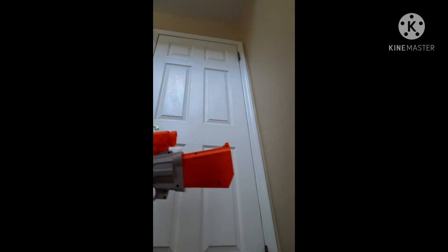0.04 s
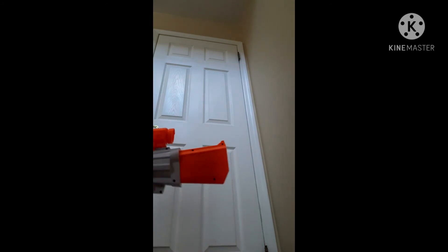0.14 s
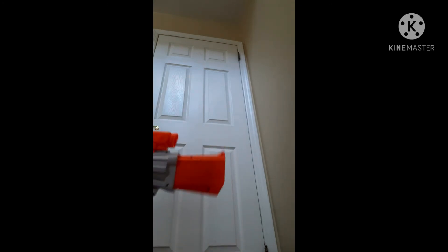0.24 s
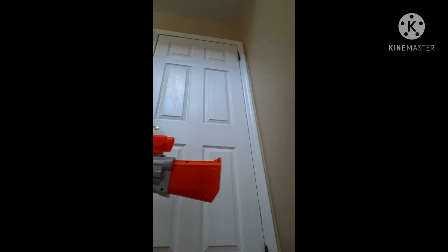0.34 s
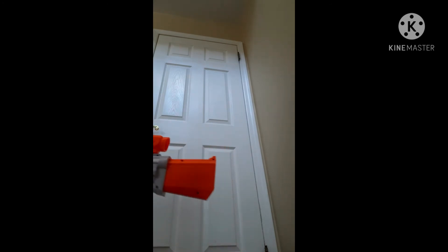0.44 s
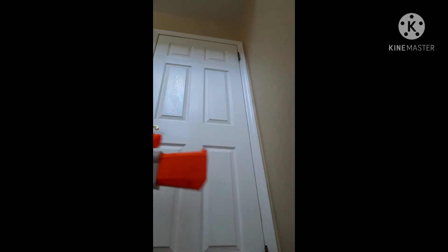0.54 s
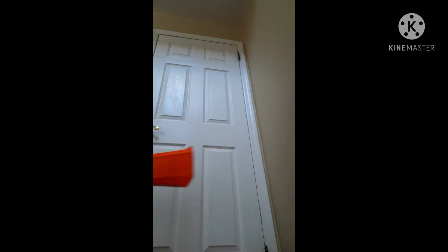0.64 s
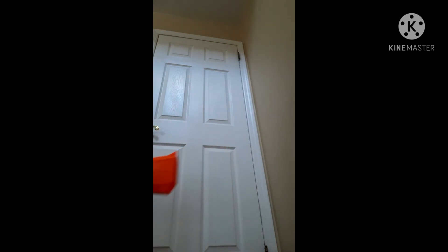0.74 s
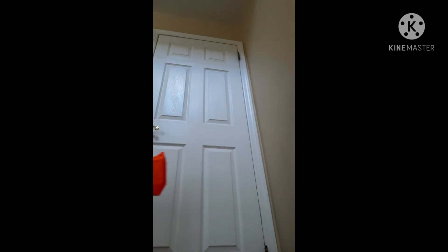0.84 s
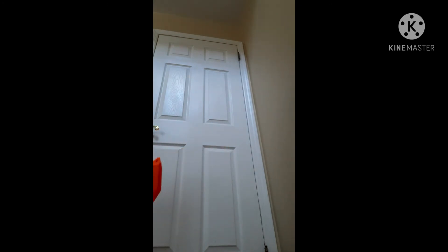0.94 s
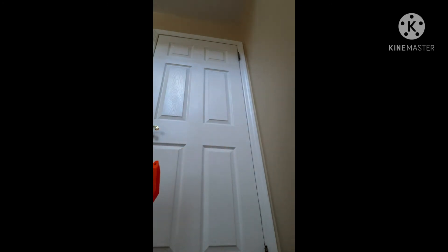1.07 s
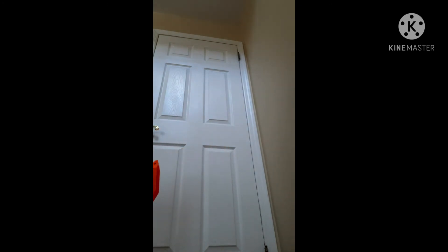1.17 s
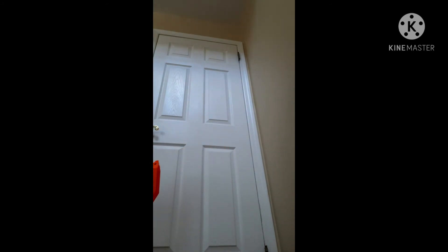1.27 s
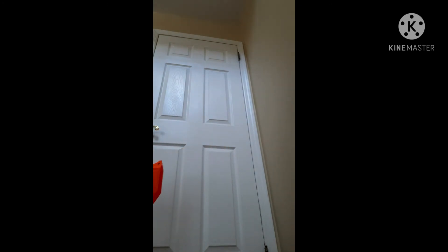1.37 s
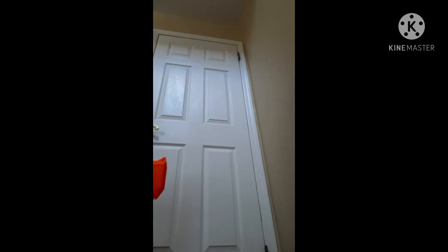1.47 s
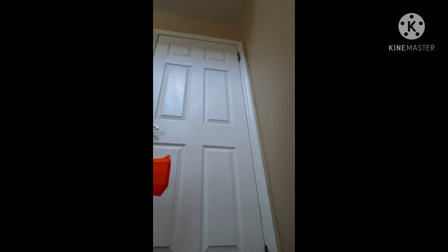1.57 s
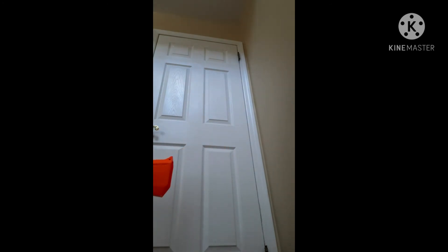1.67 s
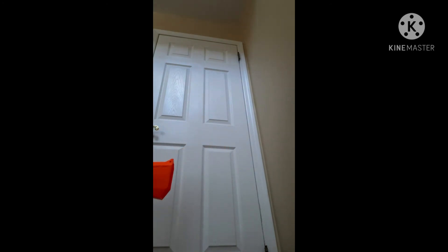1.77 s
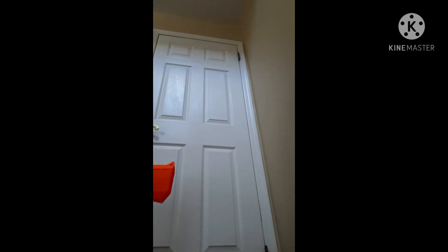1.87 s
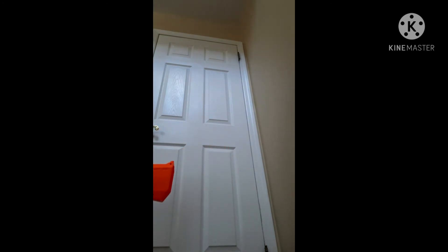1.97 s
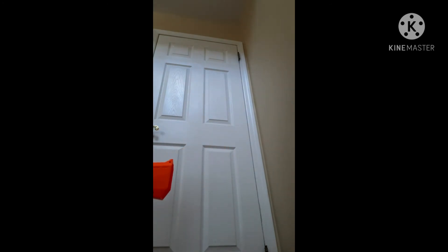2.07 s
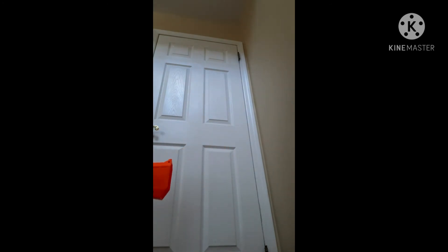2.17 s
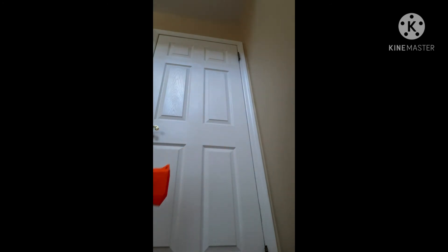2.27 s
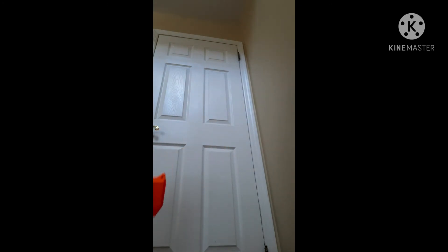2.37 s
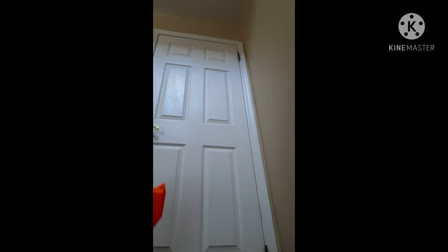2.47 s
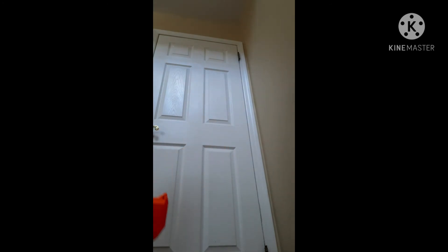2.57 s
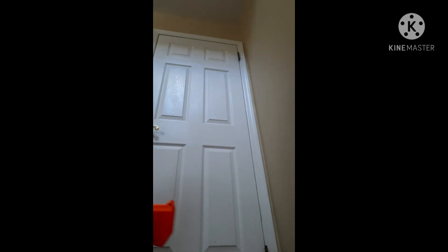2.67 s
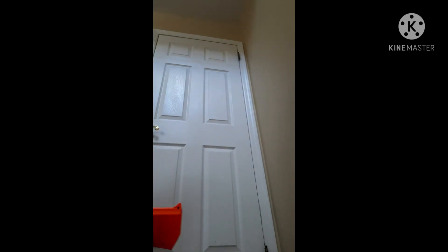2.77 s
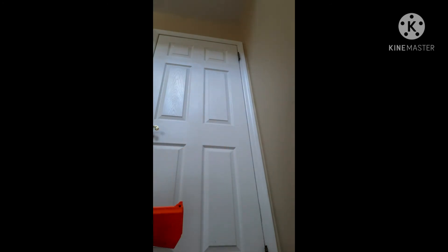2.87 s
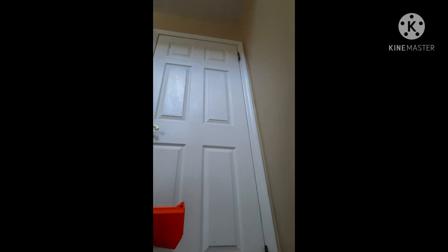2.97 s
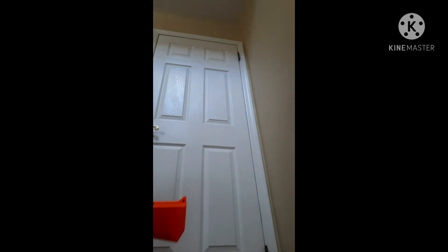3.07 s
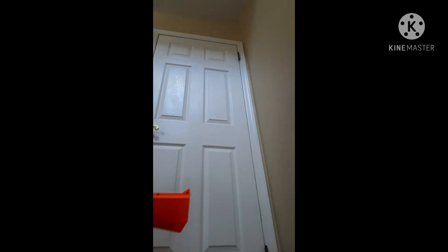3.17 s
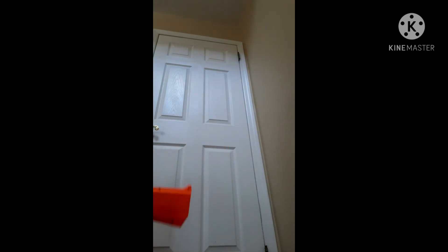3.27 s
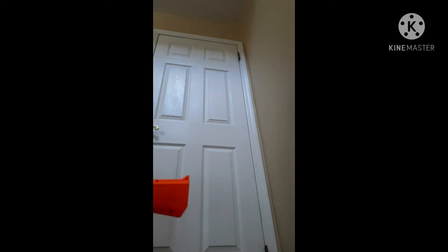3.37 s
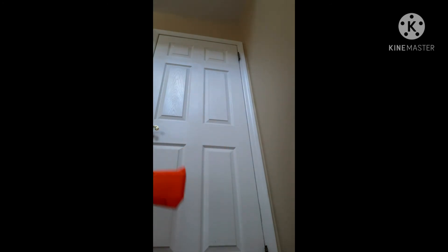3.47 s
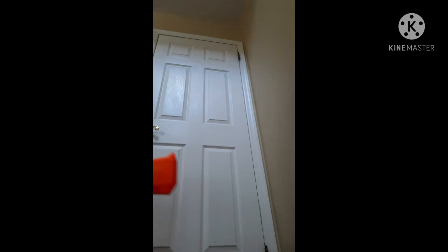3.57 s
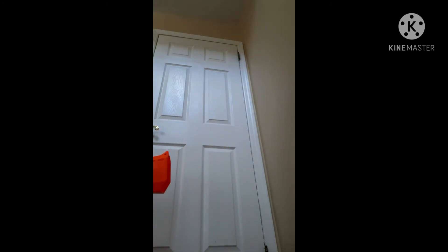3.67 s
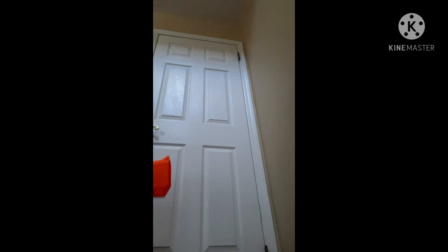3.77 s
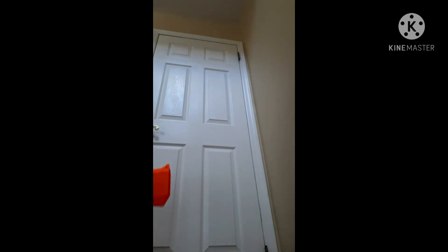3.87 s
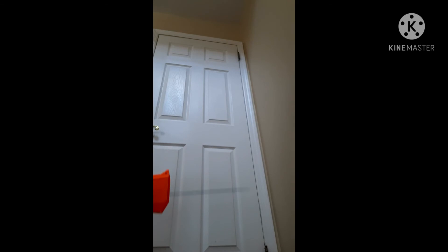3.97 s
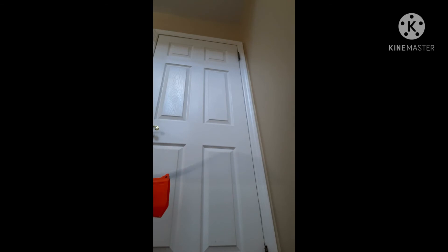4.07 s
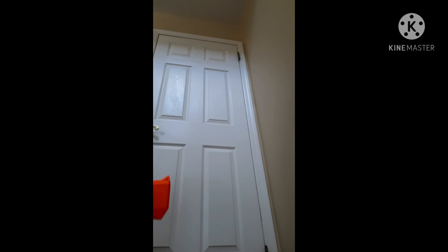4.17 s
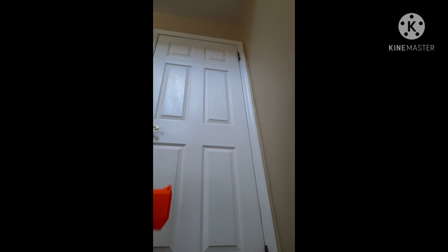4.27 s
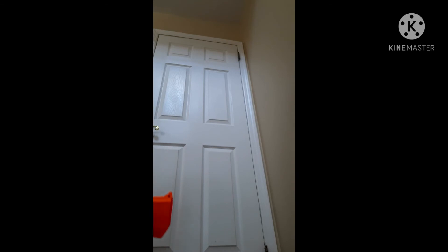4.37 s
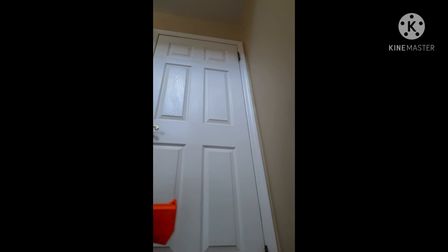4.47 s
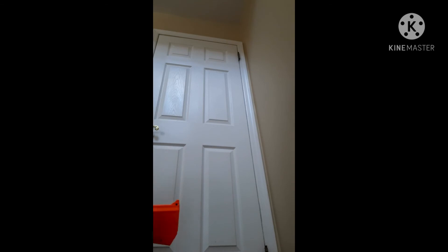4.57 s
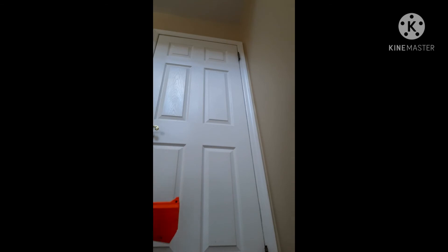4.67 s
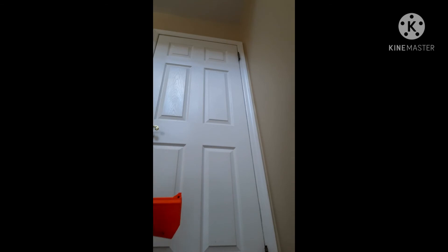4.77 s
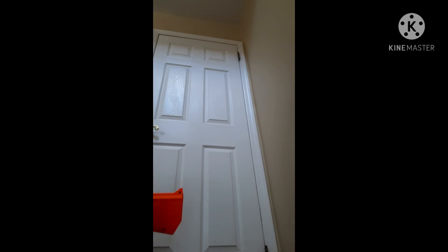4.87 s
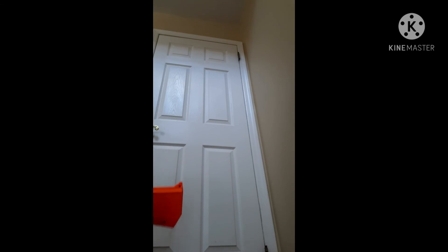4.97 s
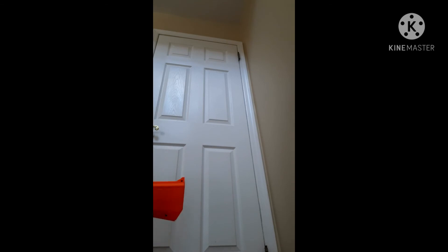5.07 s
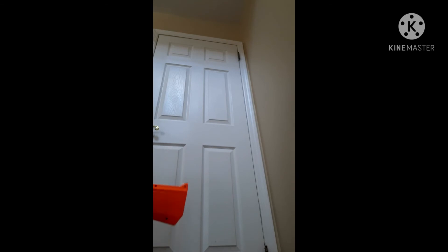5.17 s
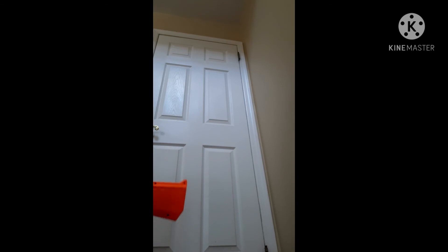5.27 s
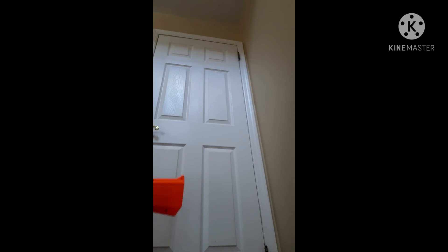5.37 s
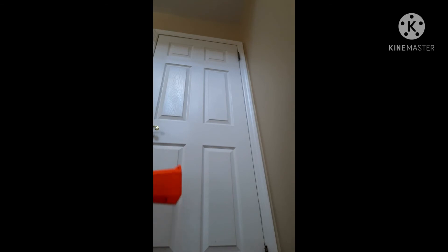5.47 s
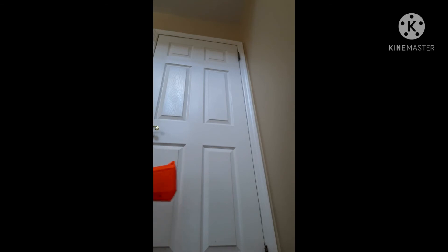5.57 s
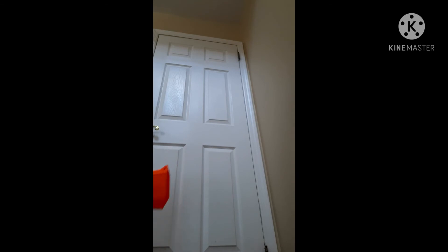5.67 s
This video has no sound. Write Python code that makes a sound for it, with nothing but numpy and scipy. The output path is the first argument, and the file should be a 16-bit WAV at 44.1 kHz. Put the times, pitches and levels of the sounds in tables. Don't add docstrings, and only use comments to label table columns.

```python
import sys
import numpy as np
from scipy import signal
from scipy.io import wavfile
from scipy.ndimage import uniform_filter1d

SR = 44100
rng = np.random.default_rng(int(sys.argv[2]) if len(sys.argv) > 2 else 0)


def master_out(mix):
    frames = np.transpose(np.atleast_2d(mix))
    ceiling = np.clip(frames, -1, 1)
    pcm = np.round(ceiling * 32767).astype(np.int16)
    wavfile.write(sys.argv[1], SR, pcm)


def voltage_ratio(level):
    return 10 ** (np.asarray(level, float) / 20)


N = 252516

# (frequency [Hz], density [dB per Hz])
HUM_COLOUR = [(15, -54), (25, -17), (43, -10.5), (96, -2), (140, -17), (179, -10), (306, -24), (447, -17),
              (511, -30), (601, -25), (1420, -33.5), (1670, -33), (5780, -35), (15700, -31.5)]
HUM_DB = -60
# (frequency [Hz], left-right likeness [-1 to 1])
HUM_LIKENESS = [(60, 0.94), (240, 0.91), (950, 0.06), (3770, 0.2), (15000, -0.76)]
# (time [s], gain [dB])
GATE = [(0, 3.5), (.698, 0), (1.299, -3), (2.001, 2), (2.699, -3.5), (2.999, -4.5), (3.6, 1.6), (4.0, 0.5),
        (4.45, -11.5), (4.698, -14.5), (5.001, -13.5), (5.399, 0), (5.72, 3.5)]
RUMBLE_DB, RUMBLE_DEPTH = -6, 0.97

# (frequency [Hz], t60 [s])
HALL_DECAY = [(100, 0.61), (400, 0.31), (1200, 0.35), (3000, 0.31), (7000, 0.23), (14000, 0.24)]
# (delay [s], left level [dB], right level [dB])
ECHOES = [(.0035, -7, -19), (.0065, -25, -22), (0.021, -27, -21.5)]
PLACE_S = [0, .41, 1.99, 2.3, 3.97, 4.2, 6]
# (delay [s], level [dB])
SIDE_WALL = [
    (0.0214, -22),
    (.0135, -10.5),
    (0.0137, -14),
    (0.0134, -6),
    (.0135, -13.5),
    (0.0136, -7),
]
# (start [s], end [s])
SHOTS = [
    (2.03, 2.1),
    (3.995, 4.07),
]

# (start [s], end [s], first level [dB], last level [dB], squeak [Hz])
STROKES = [(0, 0.147, -54.5, -46, 1692), (.15, 0.273, -43.5, -43, 1857), (.53, 0.602, -58, -57, 3000),
           (0.599, 0.676, -63, -67, 4050), (0.661, 0.855, -72.5, -68.5, 3385),
           (2.64, 3.002, -71, -82, 4200), (3.061, 3.117, -72.5, -42, 1614), (3.13, 3.26, -52.5, -42, 1394),
           (3.652, 3.679, -57, -50, 1351), (3.676, 3.709, -50, -58, 1351), (3.74, 3.96, -60.5, -70, 1833),
           (4.33, 4.681, -74, -88, 2200), (4.99, 5.134, -58, -58, 1603), (5.14, 5.187, -70.5, -44.5, 1907),
           (5.248, 5.366, -47, -67, 2000), (5.369, 5.5, -68, -55, 2500), (5.66, 5.722, -75, -56, 2616)]
BRIGHT_DB, BRIGHT_DB_PER_OCTAVE = -1.5, 5

# (time [s], peak [dB], lower tone [Hz], upper tone [Hz], upper tone level [dB])
TICK_TONES = [(0.0179, -29, 1700, 2880, -3), (0.0365, -23.5, 1050, 2980, -3), (0.0772, -32, 1350, 2410, -3),
              (0.1075, -22.5, 1770, 2140, -3), (0.1272, -30, 1080, 2530, -3), (0.15, -25, 1029, 2544, -2.5),
              (0.1615, -26, 1193, 2569, -2.5), (0.1795, -26, 1171, 2131, -3), (0.201, -25, 1183, 2888, -3),
              (0.2143, -26.5, 1302, 2154, -3), (0.2437, -28, 1209, 2742, -3), (0.4189, -27, 1150, 2620, -5),
              (0.436, -24, 1266, 2140, -3), (0.4812, -37, 1980, 3220, 0), (0.504, -34, 1560, 3200, 5),
              (0.8711, -32.5, 1754, 2890, -3), (0.9705, -44, 1747, 2200, 2), (1.0291, -41, 1880, 2300, -1),
              (1.0404, -40, 1700, 2170, -1), (1.1365, -38, 1430, 2310, -2), (2.3264, -38, 1230, 2210, -2),
              (2.396, -22, 1370, 3920, -4.5), (2.5054, -32.5, 1444, 2150, -6), (2.585, -37, 1310, 2850, -9),
              (2.9209, -44, 1820, 2490, -2), (3.0778, -34, 1390, 2890, -7), (3.1318, -37.5, 1230, 2470, -4),
              (3.1751, -31.5, 1430, 2200, -4), (3.3802, -25, 1262, 2480, -3), (3.6136, -44, 1500, 3270, -1),
              (3.7298, -31.5, 1210, 2170, -3.5), (3.8084, -34.5, 1763, 3360, -3.5),
              (3.8782, -35.5, 1353, 3240, -3), (4.2614, -36, 1493, 3240, -1), (4.3006, -39, 1250, 2065, -3),
              (5.19, -19, 1250, 2440, -1), (5.3161, -33, 1380, 3390, -6), (5.4126, -34.5, 1429, 3230, 4)]
TICK_TONE_DB, TICK_TONE_T60_S = -5.5, 0.03

# (time [s], peak [dB], pitch [Hz], t60 [s])
HOLLOW_NOTES = [(0.1061, -29.6, 447, 0.078), (0.1991, -31.1, 590, 0.061), (0.2451, -34.1, 511, 0.041),
                (0.7751, -46.6, 692, 0.042), (2.3951, -25, 706, 0.045), (2.3811, -38.1, 501, .041),
                (.4701, -38.1, 701, .031), (3.3801, -40.1, 341, .061), (2.5751, -38.6, 280, 0.067),
                (4.5981, -53.6, 1791, 0.026), (2.7781, -52.6, 323, 0.044), (3.0431, -44.6, 405, 0.073),
                (3.2211, -31, 437, 0.041), (3.7331, -38.1, 876, 0.046), (4.3671, -33.1, 342, 0.04),
                (4.7801, -59.1, 357, 0.052), (5.4921, -39.1, 861, 0.038), (3.7401, -43, 660, 0.16),
                (4.3851, -36.5, 694, 0.04), (5.4971, -45.1, 708, 0.13), (4.7701, -62, 1450, .03),
                (4.4011, -50, 1400, .03), (5.0451, -46, 800, .05)]
# (time [s], peak [dB], pitch [Hz], t60 [s])
SPRING = [
    (0.28, -14, 1215, 0.2),
    (3.245, -19.5, 1267, 0.22),
    (5.1934, -31, 1250, 0.265),
]
# (time [s], peak [dB], pitch [Hz], t60 [s])
PINGS = [(0.2812, -18, 1480, 0.07), (2.0788, -5.5, 3064, 0.035), (3.2471, -9.1, 2759, 0.032),
         (4.0095, -6, 3930, 0.029), (4.0161, -9.6, 2301, 0.07), (2.0311, -9, 2291, .07),
         (2.0331, -10, 1300, .09), (2.0431, -12.1, 4171, .04), (3.9971, -13.1, 2401, .07),
         (4.0171, -14, 1181, .06), (.2797, -11, 7901, .031), (.3016, -15, 4201, .031),
         (2.0687, -9, 4800, .02), (2.0741, -13, 790, .06), (2.0688, -6, 315, .08), (2.1091, -15, 172, 0.11),
         (4.0781, -19.1, 173, .09), (3.9981, -17, 346, .12), (2.0331, -16, 490, .08)]

# (frequency [Hz], level [dB], t60 [s])
DOOR_MODES = [(106, -10, .35), (164.7, -5, .2), (177, 0, .27), (231, -9, 0.24), (296.6, 0.5, .12),
              (350, -11.5, 0.33), (402, -16.5, 0.33), (438, -16, 0.25), (470, -11.5, .22), (502, -13, .3),
              (599, -24, .18), (777, -22, 0.33), (877, -22, .15)]
# (frequency [Hz], level [dB], t60 [s])
HALL_MODE = (75, -17.5, 0.38)
BLOW_S = [2.032, 2.043, 2.069, 2.081, 2.109, 2.58, 3.998, 4.016, 4.05, 4.08]
# (level [dB], hardness [dB per octave])
BLOWS = [(-28.5, -0.5), (-24.5, -4), (-20, 1.5), (-28, 3), (-20, -0.5), (-56.5, 7), (-26.5, 6.5),
         (-24.5, -0.5), (-23, -1.1), (-24.5, -0.5)]

JOLT_S = [
    4.0395,
    .2795,
    2.031,
    3.245,
]
# (level [dB], swing [Hz], swing length [ms], snap share [ratio])
JOLTS = [(-2.6, 90, 6.5, 2.1), (-39, 90, 5, 1.1), (-33, 100, 6.5, .8), (-56, 110, 3.5, 1.2)]

# (time [s], peak [dB], bass part [dB], treble part [dB])
SLIDE = [(0.0181, -25, -20.5, -5.5), (0.0358, -24, -27.5, -16), (0.0777, -28, -13, 2.5),
         (0.103, -28, -17, -6), (0.1063, -22, -20, -9.5), (0.1281, -31.5, -27.5, 0.5),
         (0.1498, -20.5, -28, -5.5), (0.1621, -24, -25, -2.5), (0.1801, -25.5, -10.5, -17),
         (0.2008, -21.5, -2, -2), (0.2143, -28.5, -17, -17), (0.2439, -30, -7.5, -8),
         (.2288, -33, -10, -12), (0.0927, -36, -15, -5), (0.2641, -32, -7.5, -11.5), (3.044, -38, 0, 2),
         (3.0777, -31, -2, -8), (3.0944, -39.5, -11, -2), (3.1116, -33.5, -11, -8.5),
         (3.1321, -33, -13, -1), (3.1538, -36, -15, -3.5), (3.1756, -34.5, -7, -7.5),
         (3.204, -35, 1, -16.5), (3.2218, -30, -9.5, -13.5), (4.983, -39, -9, 2), (5.046, -39, -8.5, -19),
         (5.0634, -42, -18, -12), (5.089, -39.5, -14, -22), (5.1076, -46, -13, -6), (5.1429, -45, -3, -18),
         (5.1736, -32.5, -20.5, -5)]
# (time [s], peak [dB], bass part [dB], treble part [dB], ring [ms])
LATCH = [(0.2775, -22, -20, -5, 2), (0.2793, 4.5, -31, -1, 2.65), (0.3013, -15, -26, -1, 3.5),
         (.4188, -22, -16, -10, 3), (0.433, -32, -10, -11, 4.5), (0.437, -18.5, -24, -5.5, 4.1),
         (.469, -40.5, 1.5, -9, 4.4), (0.482, -33.5, -12.5, 1.5, 5.1), (0.5046, -26.5, -28, 2.5, 3.9),
         (0.576, -45.5, -10, -10, 4.4), (3.2444, -4.5, -25.5, 3, 4.4), (3.3799, -25, -12, -12.5, 4.2),
         (3.4184, -38.5, -14.5, -6, 9.5), (3.4324, -33.5, -21.5, -3, 6), (3.4515, -41, -14, 0.5, 6.7),
         (5.1899, -17, -21, -2, 7.3), (5.2684, -31.5, -28, -2.5, 6), (5.3164, -31, -17, -5, 7.23),
         (5.3599, -35.5, -29, -11, 8.5), (5.3793, -27.5, -38, -3, 2.5), (5.3948, -47.5, 10, 0.5, 3.8),
         (5.4124, -26, -23, 4, 3.6), (5.4926, -34.5, -5, -8, 8.83)]
# (time [s], peak [dB], bass part [dB], treble part [dB], ring [ms])
SLAMS = [(2.0262, -22, -8.5, -6, 6.6), (2.03, 3, -14.5, -3, 4.1), (2.034, -0.5, -5, -0.5, 5.4),
         (2.041, -8.5, -12, 1.5, 3.9), (2.052, -15, -18.5, -5, 4.8), (3.996, 0, -17, -1, 3),
         (4.002, -3.5, -13, -1.5, 4.7), (4.008, -14, -15, 3, 4.1), (4.018, -9, -6, 0.5, 4.7),
         (4.031, -15.5, -9.5, -2.5, 6)]
# (time [s], peak [dB], bass part [dB], treble part [dB])
HANDS = [(0.779, -65, 7, -9), (0.787, -46, -13.5, -7.5), (.841, -51, -7, -7), (0.8711, -31.5, -16.5, -6),
         (0.97, -43.5, -42.5, 1), (1.028, -39.5, -19, -4.5), (1.042, -42, -20, -11), (1.1347, -35, -18, -3),
         (1.8942, -57.5, -11.5, -12), (2.0075, -48.5, -10.5, -5.5), (2.019, -51.5, -9, -5.5),
         (2.8592, -57, -18, -23), (2.9223, -43, -17, -5), (3.6138, -42, -30.5, -6),
         (3.7285, -33.5, -10, -3), (3.8083, -32.5, -29.5, -7), (3.8784, -34.5, -35, -2.5),
         (3.978, -35, -22, -4), (3.9905, -21, -8, -6), (4.5982, -60, -26.5, -12), (4.7666, -60.5, -5, -25),
         (4.8431, -64, -19.5, -12)]
# (time [s], peak [dB], bass part [dB], treble part [dB])
SLAPS = [
    (2.0685, -3, -5, -8),
    (2.076, -5, -1, -9.5),
    (2.080, -6.5, -1, -10),
    (4.040, -11, 6.5, -3.5),
    (4.051, -4.5, -3.5, -7),
    (4.059, -23.5, -22, -3),
]
# (time [s], peak [dB], bass part [dB], treble part [dB])
BOUNCES = [(2.3252, -31.5, -5.5, -9.5), (2.381, -40, 5, -2.5), (2.390, -39, 2.5, -8.5),
           (2.395, -22, -9.5, 0), (2.495, -61.5, -19, -7.5), (2.502, -38, -19, -7), (2.5049, -29.5, -8, -5),
           (2.573, -60, -3.5, -5), (2.585, -37, -1, -1), (2.779, -57, -6.5, -21), (4.2625, -29.5, -6, -3.5),
           (4.3019, -40.5, -17, -3), (4.3674, -69, 25.5, 6), (4.3843, -63.5, 5, 10), (4.3994, -53, -9, -1)]
SLIDE_PAN_DB, LATCH_PAN_DB, HAND_PAN_DB, SLAM_PAN_DB, SLAP_PAN_DB, FLOOR_PAN_DB = 0.9, 1.95, 3, 2.5, 2.5, 2
SLIDE_MS, HAND_MS, SLAP_MS, FLOOR_MS = 4.0, 3.8, 4.6, 3.4
RISE_MS_PER_DB = 0.0473
SOFT_MS_PER_DB = 0.15
SPIKY_DB = 3

# (frequency [Hz], level [dB])
SHELL = [(120, -39), (250, -17), (400, -1.5), (800, -10), (1200, -11), (2500, -16), (4000, -9.5),
         (5000, -2), (6700, 1), (7300, -6.5), (7900, -15), (11000, -18), (15000, -25), (15800, -40)]
# (frequency [Hz], width [Hz], level [dB])
CAVITY = [(1250, 50, -15.5), (1534, 430, -20), (2500, 580, -17.5), (6030, 250, -7.5), (6440, 2300, -21.5)]
# (frequency [Hz], left-right difference [dB])
PORTS = [(200, -.5), (700, -6), (1300, -2.5), (2400, 0), (4400, 3.5), (8000, 1.5), (15000, 2.5)]
PORT_LAG = 3
ALIKE_BELOW_HZ = 285


def evened(x):
    return x / np.sqrt(np.mean(x ** 2) + 1e-20)


def read(points, hz):
    f, value = np.transpose(points)
    return np.interp(np.log(hz + 1), np.log(f + 1), value)


def add(mix, s, sound):
    part = mix[..., round(s * SR):][..., :sound.shape[-1]]
    part += sound[..., :part.shape[-1]]


def causal(gain):
    log = np.log(np.maximum(np.r_[gain, gain[-2:0:-1]], 1e-5))
    return np.fft.ifft(np.exp(log - 1j * signal.hilbert(log).imag)).real[:2048]


def resonate(x, hz, width):
    turn = np.exp(2j * np.pi * np.cumsum(hz) / SR)
    r = np.exp(-np.pi * width / SR)
    return 2 * (turn * signal.lfilter([1 - r], [1, -r], x / turn)).real


def hum():
    frames, hz = N // 256 + 5, np.fft.rfftfreq(1024, 1 / SR)
    a, b, c, d = rng.standard_normal((frames, 513, 4)).T
    same = np.clip(read(HUM_LIKENESS, hz), -1, 1)[:, None]
    left = a + 1j * b
    right = same * left + np.sqrt(1 - same ** 2) * (c + 1j * d)
    spectrum = np.array([left, right]) * voltage_ratio(read(HUM_COLOUR, hz))[:, None]
    depth_db = np.interp(np.arange(frames) * 256 / SR, *np.transpose(GATE))
    low = 1 / (1 + (hz[:, None] / 600) ** 2)
    gate = voltage_ratio(low * (RUMBLE_DB + RUMBLE_DEPTH * depth_db) + (1 - low) * depth_db)
    open_rms = np.std(signal.istft(spectrum, nperseg=1024, noverlap=768)[1])
    gated = signal.istft(spectrum * gate, nperseg=1024, noverlap=768)[1][:, :N]
    return signal.sosfilt(signal.butter(4, 46, "high", fs=SR, output="sos"), voltage_ratio(HUM_DB) / open_rms * gated)


def hall(near, feed, tail_db=-9):
    taps = np.zeros((2, SR))
    at = np.arange(300, SR - 20, 20) + rng.integers(0, 20, (2, (SR - 301) // 20))
    np.put_along_axis(taps, at, rng.choice([-1., 1.], at.shape), 1)
    hz, t, z = signal.stft(taps, SR, nperseg=256)
    tail = signal.istft(z * voltage_ratio(-60 * t / read(HALL_DECAY, hz)[:, None]), SR, nperseg=256)[1]
    tail = voltage_ratio(tail_db) * tail / np.linalg.norm(tail[0])
    out = signal.fftconvolve(feed, tail, axes=1)[:, :N]
    for s, left_db, right_db in ECHOES:
        add(out, s, voltage_ratio([[left_db], [right_db]]) * near)
    now = np.arange(N) / SR
    for start, end, (s, db) in zip(PLACE_S, PLACE_S[1:], SIDE_WALL):
        add(out, s, voltage_ratio(db) * near * ((now >= start) & (now < end)))
    return out


def rubbing(slips_per_s=1800, spread_db=4, bass_db=-9, squeak_db=-6, width_hz=500):
    t = np.arange(N) / SR
    sizes = np.minimum(rng.exponential(1, N), 2.5)
    slips = voltage_ratio(spread_db * sizes) * (rng.random(N) < slips_per_s / SR)
    grain = evened(signal.lfilter([1], [1, -.98], slips) * rng.standard_normal((2, N)))
    level, hz = np.zeros(N), np.zeros(N)
    for start, end, first_db, last_db, squeak_hz in STROKES:
        length = round(max(end - start, .01) * SR)
        add(level, start, voltage_ratio(np.linspace(first_db, last_db, length) - 4.5))
        hz = np.where(t >= start, squeak_hz, hz + (hz == 0) * squeak_hz)
    level, hz = uniform_filter1d(level, size=600), uniform_filter1d(hz, size=2000)
    squeak = voltage_ratio(squeak_db) * evened(resonate(grain, hz, width_hz))
    treble = voltage_ratio(BRIGHT_DB + BRIGHT_DB_PER_OCTAVE * np.log2(hz / 2000))
    return level * np.array([voltage_ratio(bass_db) * grain, grain + squeak, treble * grain])


def tick_tones():
    t, out = np.arange(SR // 20) / SR, np.zeros((2, N))
    turns = rng.random((len(TICK_TONES), 2, 1))
    for (s, db, low_hz, high_hz, high_db), turn in zip(TICK_TONES, turns):
        upper = np.sin(2 * np.pi * (high_hz * t + turn / 3))
        tone = np.sin(2 * np.pi * low_hz * t) + voltage_ratio(high_db) * upper
        fade = voltage_ratio(db + TICK_TONE_DB - 60 * t / max(TICK_TONE_T60_S, .005))
        add(out, s, fade * tone * np.minimum(t / 0.0012, 1))
    return out


def notes(rough=0.98):
    rows = HOLLOW_NOTES + SPRING + PINGS
    t, out = np.arange(SR // 3) / SR, np.zeros(N)
    shakes = uniform_filter1d(rng.standard_normal((len(rows), 2, len(t))), size=220)
    for (s, db, hz, t60), (a, b) in zip(rows, shakes):
        grown = rough * np.minimum(t / 0.06, 1)
        shaken = 1 - grown + grown * (evened(a) + 1j * evened(b))
        tone = (shaken * np.exp(2j * np.pi * hz * t)).imag
        add(out, s, voltage_ratio(db - 4.5 - 60 * t / max(t60, .01)) * tone * np.minimum(t / 0.0005, 1))
    return out * voltage_ratio([[-1.5], [1.5]])


def door(spread=.05):
    hz, mode_db, t60 = np.transpose(3 * (DOOR_MODES + [HALL_MODE]))[:, :, None]
    t, out = np.arange(SR // 2) / SR, np.zeros(N)
    spots = rng.random((len(BLOWS), 2, len(hz), 1))
    for s, (db, hard_db), (start, tuning) in zip(BLOW_S, BLOWS, spots):
        level_db = db + mode_db + hard_db * np.log2(hz / 200) - 60 * t / np.clip(t60, .05, .36)
        rings = np.sin(2 * np.pi * (hz * (1 + spread * (2 * tuning - 1)) * t + start))
        add(out, s, (voltage_ratio(level_db) * rings).sum(0) * np.minimum(t / 0.0022, 1))
    return out


def jolts(snap_ms=.8):
    t, out = np.arange(SR // 10) / SR, np.zeros(N)
    for s, (db, hz, swing_ms, snap) in zip(JOLT_S, JOLTS):
        swing = np.sin(2 * np.pi * hz * t) * np.exp(-(1000 * t / swing_ms - 1.15) ** 2)
        add(out, s, voltage_ratio(db) * (swing - snap * np.exp(-1000 * t / snap_ms)))
    return out * voltage_ratio([[-1.2], [1.2]])


def knocks(alike=0.66):
    rows = [(*row, SLIDE_MS - SOFT_MS_PER_DB * (row[2] + 14), SLIDE_PAN_DB) for row in SLIDE]
    rows += [(*row, LATCH_PAN_DB) for row in LATCH]
    rows += [(*row, SLAM_PAN_DB) for row in SLAMS]
    rows += [(*row, HAND_MS, HAND_PAN_DB) for row in HANDS]
    rows += [(*row, SLAP_MS, SLAP_PAN_DB) for row in SLAPS]
    rows += [(*row, FLOOR_MS, FLOOR_PAN_DB) for row in BOUNCES]
    crackles, t = rng.standard_normal((len(rows), 4, 1764)), np.arange(1764) / SR
    drive = np.zeros((3, 2, N))
    for (s, db, bass_db, treble_db, ring_ms, pan_db), z in zip(rows, crackles):
        rise = np.minimum(1000 * t / (0.23 + RISE_MS_PER_DB * max(-db, 0)), 1)
        spikes = evened(voltage_ratio(SPIKY_DB * evened(uniform_filter1d(z[3], size=24))))
        shape = np.exp(-1000 * t / np.clip(ring_ms, .5, 12)) * rise * spikes
        crackle = alike * z[0] + np.sqrt(1 - min(alike, 1) ** 2) * z[1:3]
        burst = crackle * shape * voltage_ratio([[pan_db / 2], [-pan_db / 2]])
        levels = voltage_ratio(db - 2.0 + np.array([bass_db, 0, treble_db]))
        add(drive, s, levels[:, None, None] * burst)
    return drive


def shell(drive, bass_hz=950, treble_hz=4500):
    hz = np.fft.rfftfreq(4096, 1 / SR)
    body = voltage_ratio(read(SHELL, hz))
    for f, width, db in CAVITY:
        body = body + voltage_ratio(db) / np.hypot(1, 2 * (hz - f) / width)
    low = 1 / (1 + (hz / bass_hz) ** 8)
    high = 1 / (1 + (treble_hz / (hz + 1)) ** 8)
    out = np.zeros((2, N))
    for part, share in zip(drive, (low, (1 - low) * (1 - high), high)):
        taps = [causal(body * share * voltage_ratio(side * read(PORTS, hz) / 2)) for side in (1, -1)]
        taps = taps / np.linalg.norm(taps[0] + taps[1]) * 2
        out += signal.oaconvolve(part, taps, axes=1)[:, :N]
    return out


def scene():
    near = shell(knocks() + rubbing()) + notes() + tick_tones()
    near[0] = np.roll(near[0], PORT_LAG)
    panel, t = door(), np.arange(N) / SR
    blast = near * sum((t > start) & (t < end) for start, end in SHOTS)
    hiss = signal.sosfiltfilt(signal.butter(4, 7600, "high", fs=SR, output="sos"), blast)
    feed = near + voltage_ratio(-5.0) * blast + voltage_ratio(8.5) * hiss + voltage_ratio(-14.5) * panel
    heard = near + hall(near, feed)
    low = signal.sosfiltfilt(signal.butter(2, ALIKE_BELOW_HZ, fs=SR, output="sos"), heard)
    heard = heard - low + low.mean(0) * voltage_ratio([[-1.6], [1.6]])
    return heard + panel * voltage_ratio([[-.6], [.6]]) + jolts() + hum()


def low_pass(x):
    return signal.sosfilt(signal.butter(12, 15500, fs=SR, output="sos"), x)


def record(dry):
    knee = 5
    mix = dry / (1 + abs(dry) ** knee) ** (1 / knee)
    return low_pass(mix)


dry = scene()
out = record(dry)
master_out(out)
```